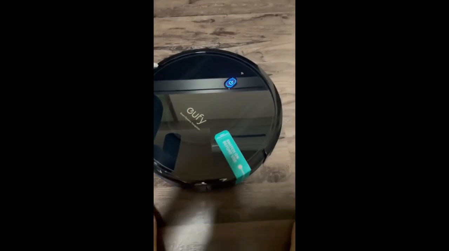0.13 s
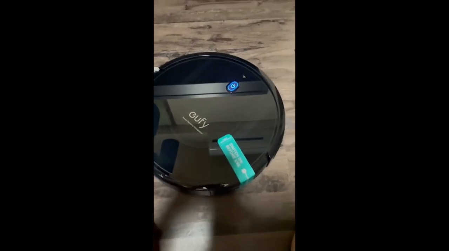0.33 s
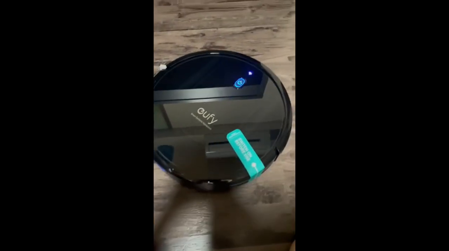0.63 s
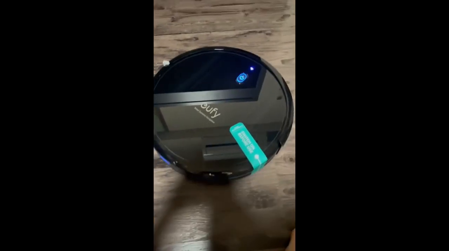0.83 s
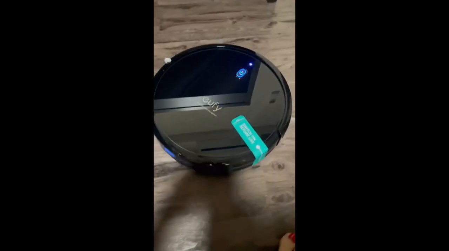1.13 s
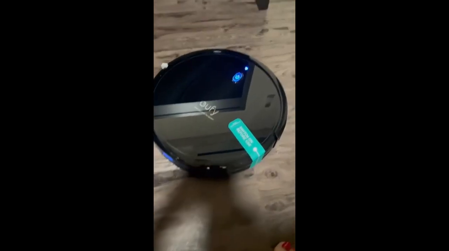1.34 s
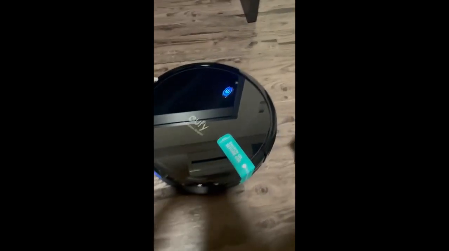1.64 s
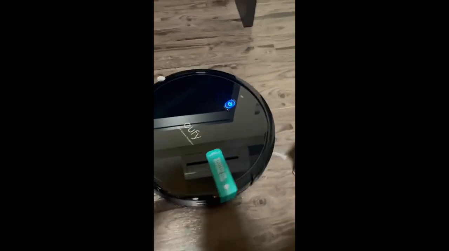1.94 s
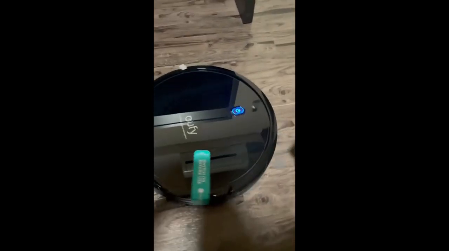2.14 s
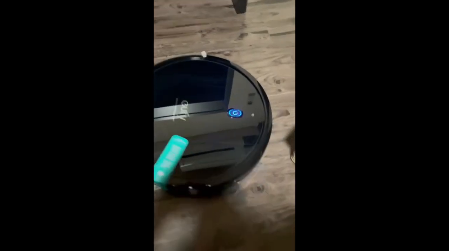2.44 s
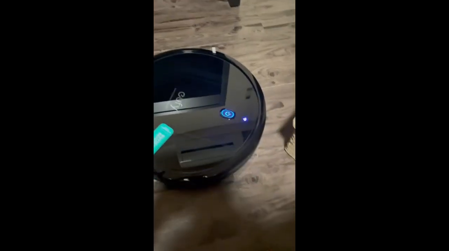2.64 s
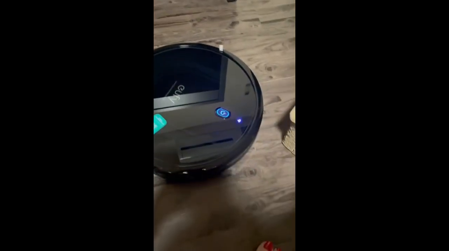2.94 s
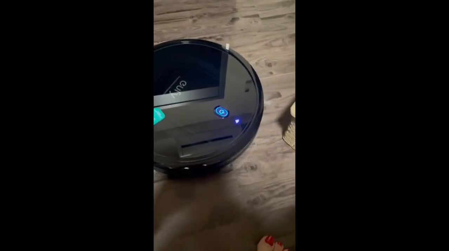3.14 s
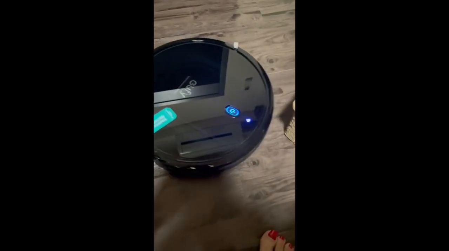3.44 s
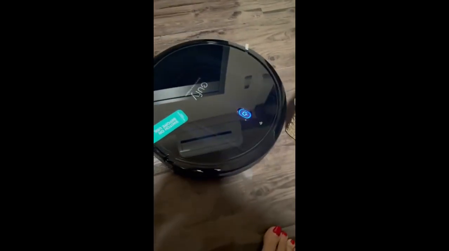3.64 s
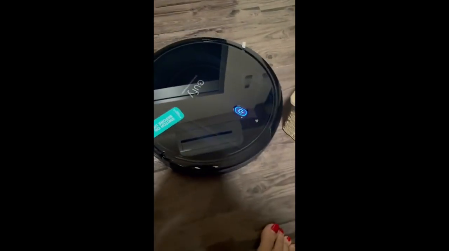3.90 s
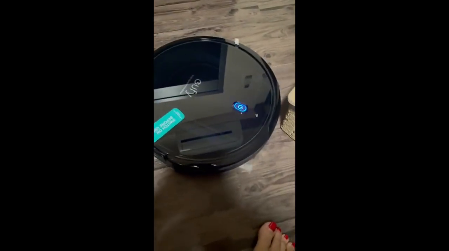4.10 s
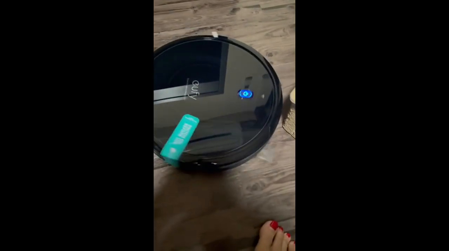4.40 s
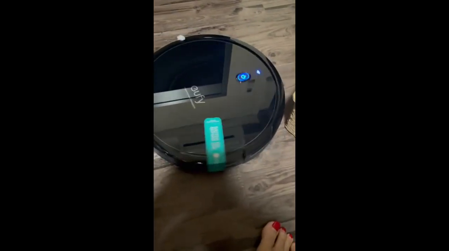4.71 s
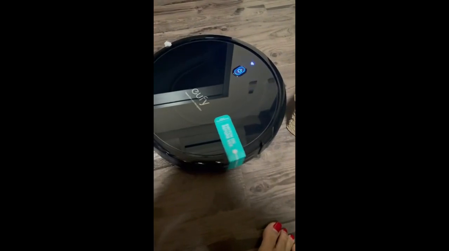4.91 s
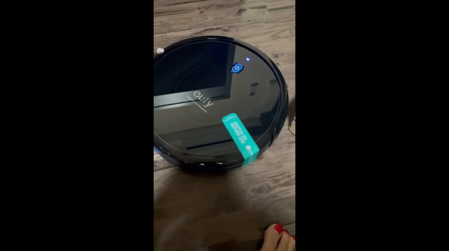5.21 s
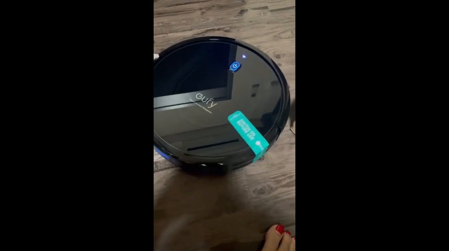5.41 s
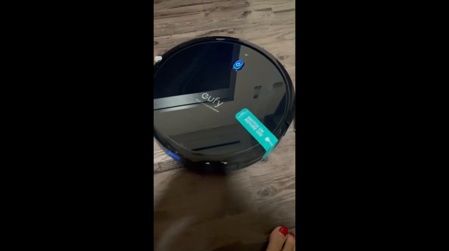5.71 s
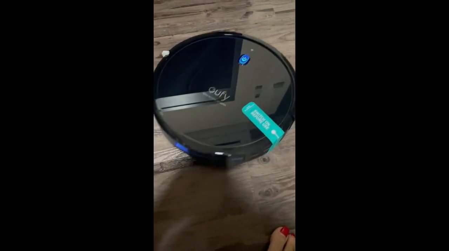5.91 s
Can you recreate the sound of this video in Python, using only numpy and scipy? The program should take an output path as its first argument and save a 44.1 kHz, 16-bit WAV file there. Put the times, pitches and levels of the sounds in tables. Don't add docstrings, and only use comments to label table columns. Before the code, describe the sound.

Close, continuous rush of vacuum airflow over humming motors, a thin whine rising and dipping as the machine pivots, while soft bassy buffets bump the microphone.

```python
import sys
import numpy as np
from scipy import signal
from scipy.fft import irfft, next_fast_len
from scipy.io import wavfile
from scipy.ndimage import uniform_filter1d

SR = 44100
rng = np.random.default_rng(int(sys.argv[2]) if len(sys.argv) > 2 else 0)


def wav_out(sig):
    wavfile.write(sys.argv[1], SR, np.round(np.clip(np.atleast_2d(sig).T, -1, 1) * 32767).astype(np.int16))


def gain_from_decibels(decibels):
    exponent = np.asarray(decibels, float) / 20
    return 10 ** exponent


N = 266893

# time_s, gearbox_away_0to1, outlet_in_view_0to1
POSE = [
    (0, 0.12, 0),
    (1.0, 0, 0.6),
    (1.3, 0.6, 0.57),
    (2.0, 0.18, 0.3),
    (2.5, 0.93, 1),
    (4.15, 1, .8),
    (4.5, 0.22, 0.87),
    (5.0, 0, 1),
    (5.7, 0.03, .8),
    (6.05, 0.4, 0.7),
]
# pitch_hz, density_db
ROAR_SPECTRUM = [(60, -26.5), (125, -20), (190, -5.5), (350, -7.5), (520, -10.5), (700, -12), (900, -13),
                 (1400, -16), (2000, -19), (2800, -22), (3250, -26), (4200, -29), (6300, -33), (7500, -42)]
# pitch_hz, width_hz, level_db
HOUSING_MODES = [(68.4, 7, -48), (270, 21, -48), (416, 90, -45), (620, 34, -49), (690, 47, -47.5),
                 (2800, 66, -60), (5000, 650, -67.5)]
# centre_s, length_s, pitch_hz, width_hz, level_db
GLINTS = [(0.55, 0.12, 2720, 64, -46), (2.35, .12, 3000, 74, -47), (2.38, 0.18, 2090, 79, -48),
          (1.35, 0.28, 2150, 90, -52), (3.2, 0.36, 3000, 36, -49), (0.066, 0.17, 700, 83, -41.5),
          (2.0, .3, 1595, 25, -46), (1.13, 0.12, 3300, 120, -55)]
# multiple_of_shaft, level_db
FAN_ORDERS = [(1, 0), (3, -16.5), (8, -20), (16, -34.5)]
# multiple_of_shaft, level_db
BRUSH_ORDERS = [(1, 0.5), (10, -23)]
# multiple_of_shaft, level_db
GEAR_ORDERS = [(17.6, -8.5), (18, 1), (19.05, -6), (23.3, -10.5), (35.6, -11.5)]
# time_s, pitch_hz
MESH_PITCH = [(0, 1218), (.5, 1231), (1.0, 1236), (1.3, 1226), (2.1, 1234), (2.45, 1229), (4.15, 1225),
              (4.7, 1233), (5.55, 1239), (5.75, 1230), (6.05, 1237)]
# centre_s, peak_db, pitch_hz,
# length_cycles
EDDIES = [(0.291, -26.5, 73, 1.4), (0.344, -18.5, 106, 0.9), (0.381, -11.5, 78, 1.2),
          (0.419, -23, 103, 0.68), (0.479, -27, 80, 0.95), (0.54, -19, 97, 0.37), (0.612, -19.5, 102, 1.2),
          (0.621, -15.5, 58, 1.2), (0.663, -25, 98, 1.6), (0.72, -25.2, 59.3, 2), (1.013, -28, 54, 0.62),
          (1.945, -24, 84, 0.81), (2.815, -27, 63, 0.65), (2.888, -27, 73, 1.6), (3.05, -19, 66.6, 0.77),
          (3.131, -22.5, 63.5, 0.55), (3.472, -13.5, 78, 0.46), (3.645, -18.5, 100, 0.36),
          (3.727, -21, 74.3, 0.54), (3.908, -21.5, 105, 0.37), (4.574, -16.5, 76.9, 0.67),
          (4.656, -19, 102, 0.72), (4.7, -24.5, 67, 0.88), (4.849, -25.5, 85.6, 1.2), (4.91, -23, 67, 0.6),
          (5.16, -25, 63, 0.79), (5.231, -28.5, 74.5, 0.66), (5.745, -22.6, 62.9, 1.2),
          (5.918, -20, 77.4, 0.9), (5.994, -24.0, 65, 0.64),
          (.375, -19.5, 290, 0.49), (.6, -27, 154, 1.1), (0.643, -18.5, 123, 0.54), (.654, -16, 282, 0.76),
         (0.656, -15, 167, 0.54), (1.926, -27, 170, .6), (2.759, -21, 113.5, 0.37),
         (3.038, -21.5, 118, 0.95), (3.213, -26.5, 106, 0.98), (3.455, -22, 280, 0.7),
         (3.705, -18.5, 131, 1.2), (3.705, -20, 249, 1.1), (4.557, -21, 169, 0.51), (5.52, -29, 90, 1.0),
         (5.6, -22.5, 119, 0.6), (5.625, -27, 60, .8), (5.932, -27, 117, 1.1)]
# start_s, hold_s, level_db
GUSTS = [(0, 0.017, -40.5), (.1, 0.085, -46), (.3, .06, -35), (.44, .08, -32.5), (.68, 0.15, -39.5),
         (1.0, 0.067, -41.5), (1.75, 0.18, -42.5), (2.8, 0.34, -38.5), (3.4, 0.29, -39.5), (3.9, .15, -41),
         (4.55, .3, -35), (5.15, 0.07, -43.5), (5.48, 0.17, -35.5), (5.72, .3, -39.5)]
# start_s, hold_s, level_db
OPPOSED_GUSTS = [(0, .12, -46), (.32, .05, -47), (.55, 0.17, -42.5), (.8, .15, -52.5), (1.03, 0.3, -42),
                 (1.62, 0.092, -44), (1.75, 0.19, -45.5), (2.75, 0.13, -47.5), (3.02, 0.04, -35.5),
                 (3.15, .7, -47), (4.55, 0.23, -48), (5.33, 0.15, -41.5), (5.73, .04, -54), (5.93, 0.069, -55)]
# pitch_hz, left_minus_right_db
BALANCE = [(100, 1), (350, .5), (700, 2.7), (1400, 1.5), (3000, 0), (6000, -.3)]
# pitch_hz, difference_db
PORT_SPREAD = [(100, -26.5), (300, -15.5), (500, -17.5), (850, -7.5), (1050, -4), (1700, -15), (2150, -10),
               (2700, 1.5), (3150, -2), (3600, -7), (4400, -0.5), (5400, -6.5), (6000, 2), (7200, 5.5)]
# pitch_hz, share_0to1
ECHO_DEPTH = [(300, .15), (1200, .5), (2800, 1), (3800, .8), (4600, .35), (7500, .35)]

# facing_db, change_gearbox_away_db, change_outlet_in_view_db
OUTLET_DB, CHAMBER_DB, VENT_DB = (-59, 0, 13.5), (-53.5, 2, 2), (-44, -4, -4)
FAN_DB, BRUSH_DB = (-41.5, 2, 0.5), (-43, 0.5, -4)
WHINE_DB, CASE_DB = (-45.5, -9, 1), (-42, -7, -0.5)
FAN_HZ, BRUSH_HZ = 241.55, 300.0
GEAR_TEETH = 18


def rms_one(x):
    return x / np.sqrt(np.mean(x ** 2) + 1e-20)


def in_time(rows):
    s, *columns = np.transpose(rows)
    return [np.interp(np.arange(N) / SR, s, column) for column in columns]


def at_hz(points, hz):
    points = np.array(points)
    return np.interp(np.log(hz), np.log(points[:, 0]), points[:, 1])


def heard_db(part_db):
    facing, away_change, outlet_change = part_db
    away, outlet = in_time(POSE)
    return facing + away_change * away + outlet_change * outlet


def drift(rate):
    hop = 40
    pole = np.exp(-2 * np.pi * hop * rate / SR)
    noise = rng.standard_normal(N // hop + 2002)
    slow = signal.lfilter([1], [1, -2 * pole, pole * pole], noise)[2000:]
    return np.interp(np.arange(N) / hop, np.arange(len(slow)), rms_one(slow))


def placed(hz):
    return gain_from_decibels(at_hz(BALANCE, hz) / 2 * np.array([[1], [-1]]))


def stereo_noise(shape):
    size = next_fast_len(N, True)
    hz = np.arange(1, int(8000 * size / SR)) * SR / size
    mid, side = rng.standard_normal((2, len(hz))) + 1j * rng.standard_normal((2, len(hz)))
    lag = 0.6 * np.exp(-(np.log(hz / 2800) / 0.2) ** 2)
    apart = 1j * lag * mid + np.sqrt(1 - np.minimum(lag, 1) ** 2) * side
    pair = mid + gain_from_decibels(at_hz(PORT_SPREAD, hz)) * apart * [[1], [-1]]
    spectrum = np.pad(pair * placed(hz) * shape(hz), ((0, 0), (1, 0)))
    return rms_one(irfft(spectrum, size)[:, :N])


def resonant_air(centre_hz, width_hz, flicker_db):
    noise = stereo_noise(lambda hz: 1 / (1 + ((hz - centre_hz) / width_hz) ** 2))
    return noise * gain_from_decibels(flicker_db * (drift(0.32) + 0.3 * drift(18.0)))


def airflow():
    out = gain_from_decibels(-34) * stereo_noise(lambda hz: gain_from_decibels(at_hz(ROAR_SPECTRUM, hz) - 40 * (hz < 40)))
    for hz, width, db in HOUSING_MODES:
        out += gain_from_decibels(db) * resonant_air(hz, width, flicker_db=1.9)
    out += gain_from_decibels(heard_db(OUTLET_DB)) * resonant_air(2385, 180, flicker_db=-0.4)
    out += gain_from_decibels(heard_db(CHAMBER_DB)) * resonant_air(3550, 240, flicker_db=0.0)
    out += gain_from_decibels(heard_db(VENT_DB)) * resonant_air(1743, 310, flicker_db=1.2)
    t = np.arange(N) / SR
    for s, length, hz, width, db in GLINTS:
        in_line = np.exp(-0.5 * ((t - s) / length) ** 2)
        out += gain_from_decibels(db) * in_line * resonant_air(hz, width, flicker_db=-2.5)
    return out


def shifting_echoes(x, slow_db, quick_db):
    hz, _, parts = signal.stft(x, SR, nperseg=1024)
    slow = slow_db * at_hz(ECHO_DEPTH, hz + 1)
    quick = quick_db * np.clip(hz / 2000, 0, 1)
    patches = 0
    for db, tall_bins, wide_frames in ((slow, 2, 20), (quick, 3, 4)):
        field = rng.standard_normal(parts.shape[1:])
        for size, axis in ((tall_bins, 0), (tall_bins, 0), (wide_frames, 1), (wide_frames, 1)):
            field = uniform_filter1d(field, size, axis=axis)
        patches = patches + db[:, None] * rms_one(field)
    return signal.istft(parts * gain_from_decibels(patches), SR, nperseg=1024)[1][:, :N]


def tones(shaft_hz, orders, wander, flutter_db):
    turns = 2 * np.pi * np.cumsum(shaft_hz * (1 + wander * drift(2.59))) / SR
    out = 0
    for multiple, level_db in orders:
        wave = np.sqrt(2) * np.sin(multiple * turns + rng.uniform(0, 2 * np.pi))
        level = gain_from_decibels(level_db + flutter_db * drift(6.1))
        out = out + placed(multiple * np.mean(shaft_hz)) * wave * level
    return out


def motors():
    fan = tones(FAN_HZ, FAN_ORDERS, wander=0.0004, flutter_db=2.05)
    brush = tones(BRUSH_HZ, BRUSH_ORDERS, wander=0.001, flutter_db=3.0)
    return gain_from_decibels(heard_db(FAN_DB)) * fan + gain_from_decibels(heard_db(BRUSH_DB)) * brush


def gearbox(mesh_hz):
    whine = tones(mesh_hz / GEAR_TEETH, GEAR_ORDERS, wander=0.001812, flutter_db=1.5)
    case = resonant_air(1189, 130, flicker_db=-0.6)
    return gain_from_decibels(heard_db(WHINE_DB)) * whine + gain_from_decibels(heard_db(CASE_DB)) * case


def draught(gusts, rise_s, settle_s):
    t = np.arange(0, N / SR, 0.002)
    push = 0
    for s, hold, db in gusts:
        rise = np.minimum((t - s) / rise_s, 0)
        settle = np.maximum((t - s - hold) / settle_s, 0)
        push = push + gain_from_decibels(db) * np.exp(rise - settle)
    return np.interp(np.arange(N) / SR, t, push)


def rumble_noise(fall):
    def shape(hz):
        return (hz / 72) ** 1.71 / (1 + (hz / 72) ** fall) / (1 + (30 / hz) ** 5.9)
    return stereo_noise(shape)


def buffeting():
    rumble = gain_from_decibels(-45) + draught(GUSTS, rise_s=0.034, settle_s=0.08)
    out = rumble * gain_from_decibels(1.8 * drift(13)) * rumble_noise(fall=3.81)
    opposed = draught(OPPOSED_GUSTS, rise_s=0.03, settle_s=0.03) * gain_from_decibels(2.7 * drift(12))
    out += opposed * rumble_noise(fall=3.1)[0] * [[1], [-1]]
    eddies = EDDIES
    chance = rng.random((len(eddies), 2))
    for (s, db, hz, cycles), (start, lean) in zip(eddies, chance):
        reach_s = 4 * cycles / hz
        near = np.arange(max(int((s - reach_s) * SR), 0), min(int((s + reach_s) * SR), N))
        turn = (near / SR - s) * hz
        swing = np.exp(-0.5 * (turn / cycles) ** 2) * np.cos(2 * np.pi * (turn + start))
        out[:, near] += gain_from_decibels(db + 2.1 * (lean - 0.5) * np.array([[1], [-1]])) * swing
    return out


def scene():
    mesh_hz, = in_time(MESH_PITCH)
    beat = 1 + 0.03 * np.sin(2 * np.pi * np.cumsum(mesh_hz / GEAR_TEETH) / SR)
    air = shifting_echoes(beat * airflow(), slow_db=1.1, quick_db=1.3)
    return air + motors() + gearbox(mesh_hz) + buffeting()


def spectral_expander(x, strength, from_hz):
    hz, _, parts = signal.stft(x, SR, nperseg=2048, noverlap=1536)
    power = np.abs(parts.sum(axis=0)) ** 2 + 1e-20
    now = uniform_filter1d(uniform_filter1d(power, size=3, axis=0), size=3, axis=1)
    usual = uniform_filter1d(uniform_filter1d(power, size=15, axis=0), size=41, axis=1)
    exponent = strength * np.clip(hz / from_hz - 0.5, 0, 1)
    gain = np.clip(now / usual, 1e-3, 1.5) ** exponent[:, None]
    weak = uniform_filter1d(now, size=3, axis=0) < 0.42 * usual
    gain[weak & (hz[:, None] > from_hz)] *= 0.2
    return signal.istft(parts * gain, SR, nperseg=2048, noverlap=1536)[1][:, :N]


def thrifty_stereo(x, weak_db, unsure_db):
    frame, grid, bins, top_bin = 1024, 104, 352, 320
    n, count = np.arange(2 * frame), N // frame + 3
    window = np.sin(np.pi * (n + 0.5) / (2 * frame))
    phase = np.pi / frame * np.outer(n + 0.5 + frame / 2, np.arange(bins) + 0.5)
    basis = np.cos(phase) * window[:, None]
    padded = np.pad([x[0] + x[1], x[0] - x[1]], ((0, 0), (2 * frame - grid, 2 * frame)))
    common, apart = padded[:, np.arange(count)[:, None] * frame + n] @ basis

    def level(v, size):
        return uniform_filter1d(v ** 2, size=size, axis=1) + 1e-20

    whim = rms_one(uniform_filter1d(rng.standard_normal((count, bins // 8)), size=4, axis=0))
    margin = gain_from_decibels(weak_db + unsure_db * whim.repeat(8, axis=1))
    apart = apart * (level(apart, size=4) > margin ** 2 * level(common, size=16))
    kept = rng.random(count) < 0.27
    top = common[:, top_bin - 16:]
    top *= np.abs(top) > 0.6 * np.sqrt(np.mean(top ** 2))
    common[~kept, top_bin:] = 0
    frames = np.array([common + apart, common - apart]) @ basis.T / frame
    out = frames[:, 1:, :frame] + frames[:, :-1, frame:]
    return out.reshape(2, -1)[:, frame - grid:][:, :N]


def low_pass(x):
    return signal.sosfilt(signal.butter(12, 7620, fs=SR, output="sos"), x)


def record(dry):
    quieted = spectral_expander(dry, strength=0.26, from_hz=1480)
    mix = thrifty_stereo(quieted, weak_db=-14, unsure_db=3.5)
    return low_pass(mix)


dry = scene()
out = record(dry)
wav_out(out)
```